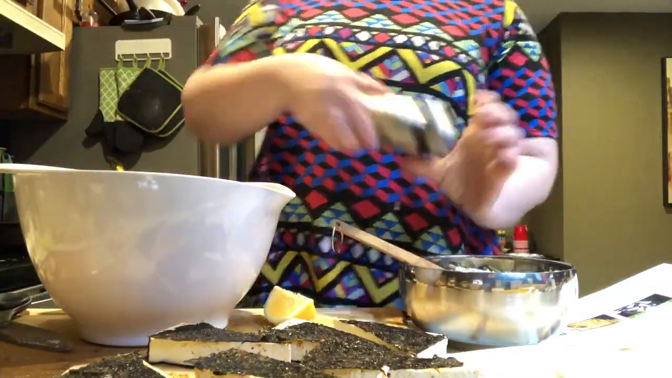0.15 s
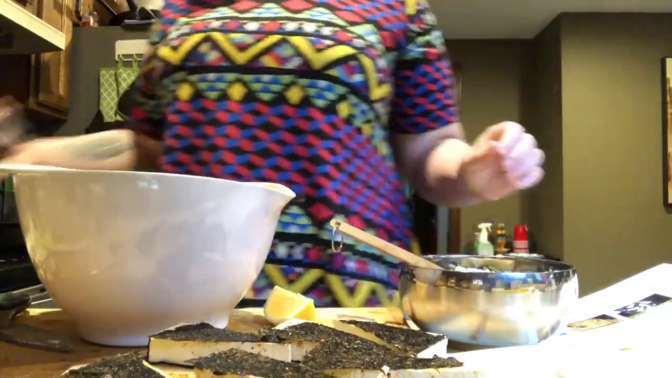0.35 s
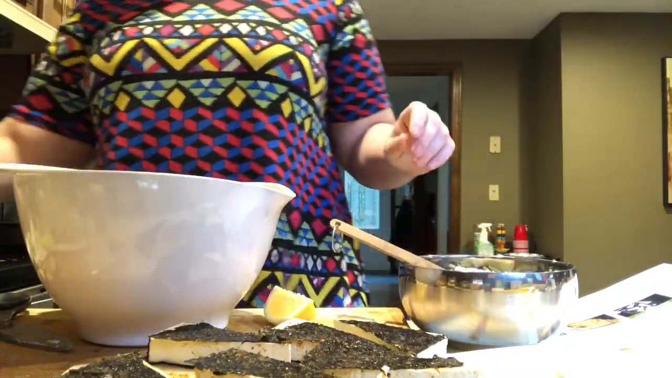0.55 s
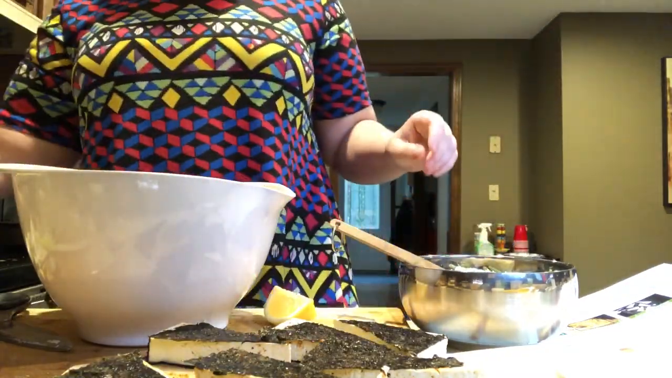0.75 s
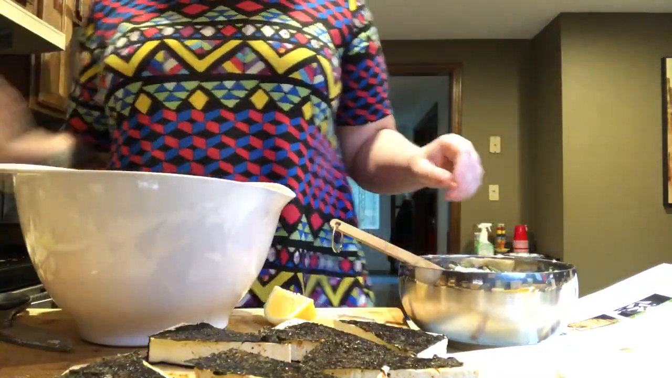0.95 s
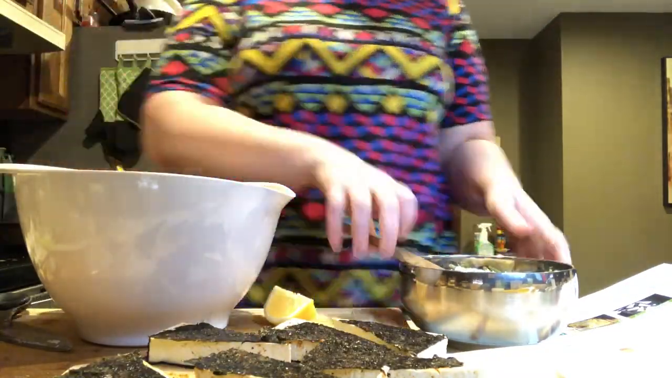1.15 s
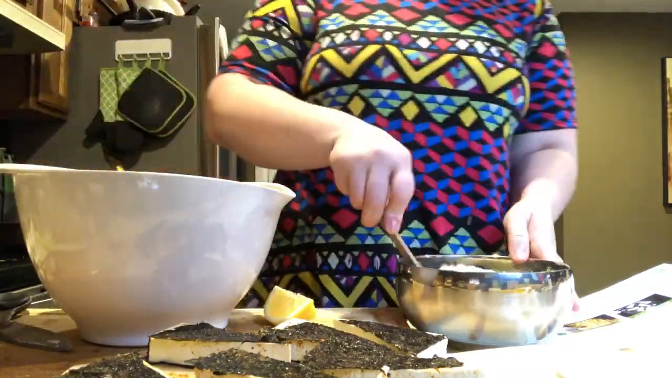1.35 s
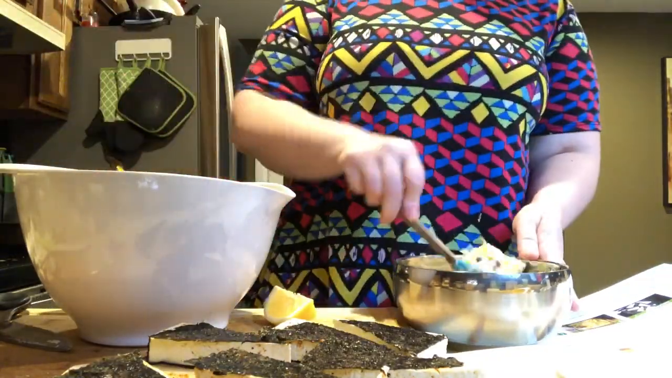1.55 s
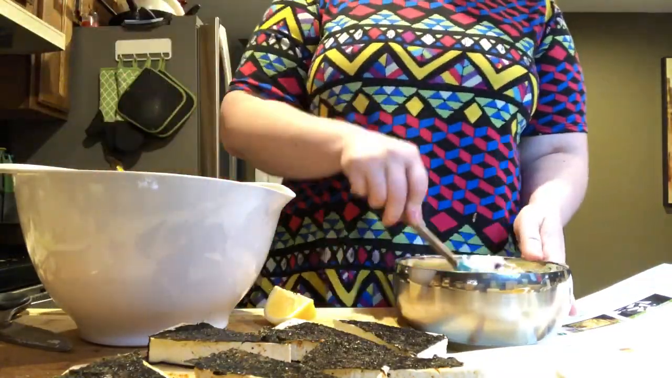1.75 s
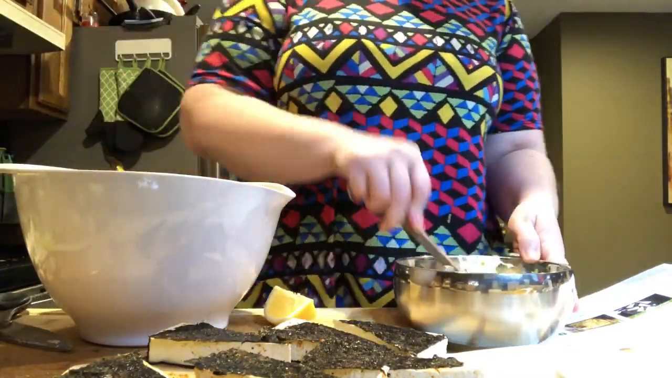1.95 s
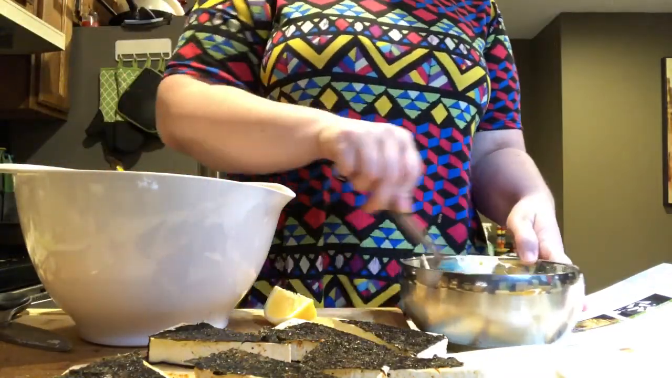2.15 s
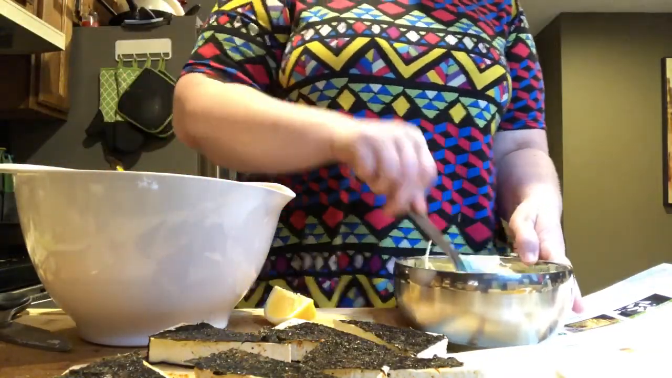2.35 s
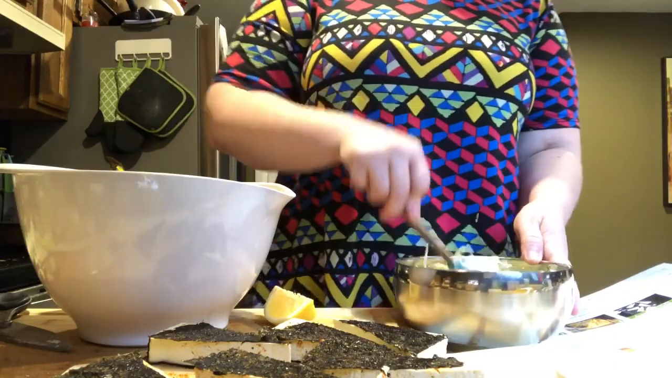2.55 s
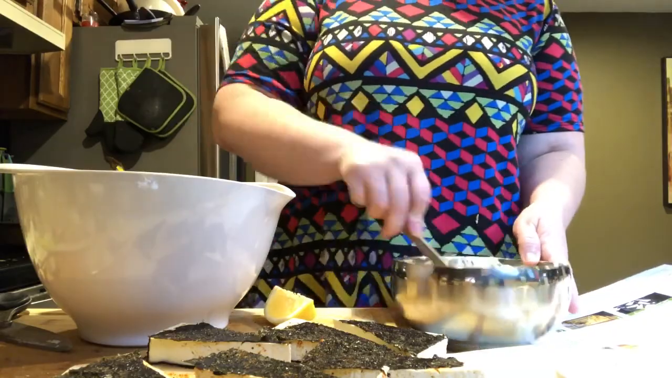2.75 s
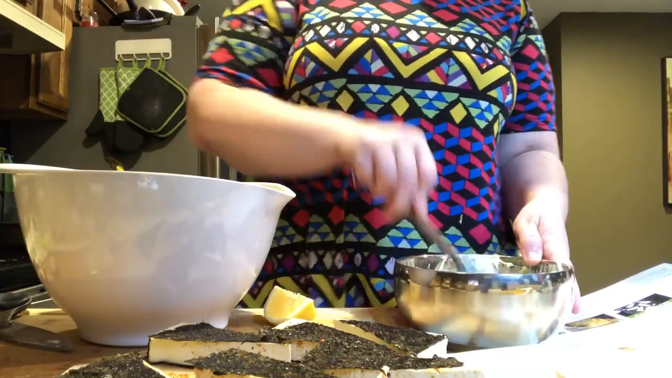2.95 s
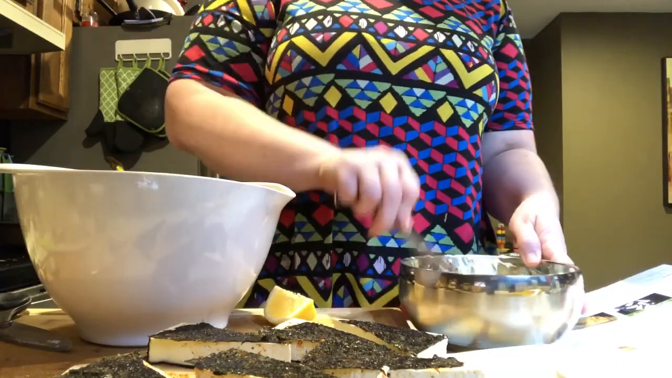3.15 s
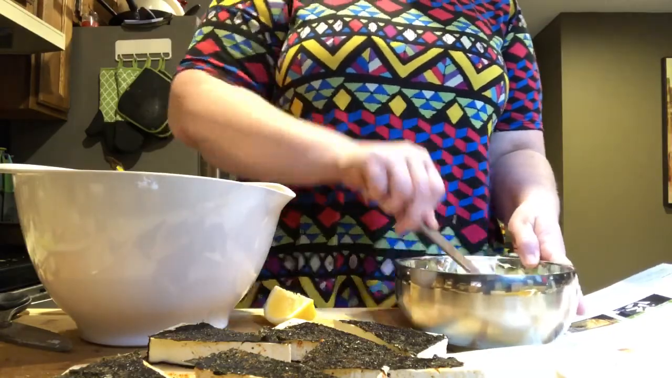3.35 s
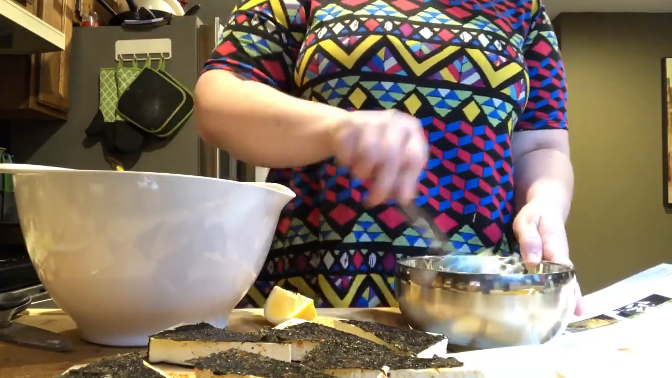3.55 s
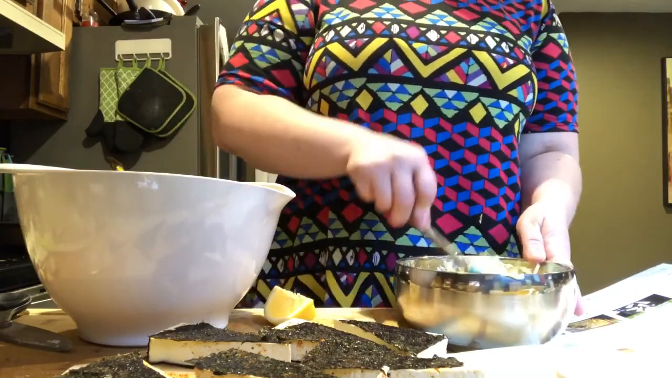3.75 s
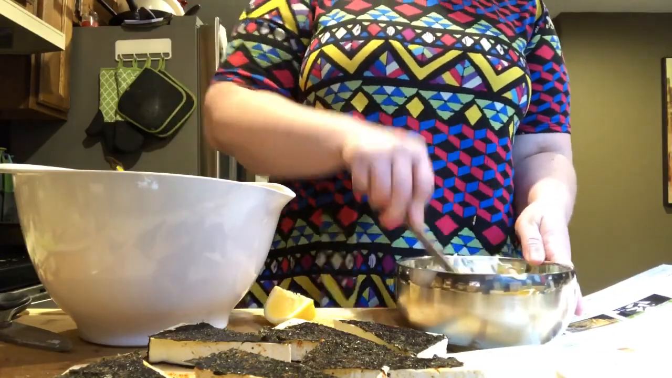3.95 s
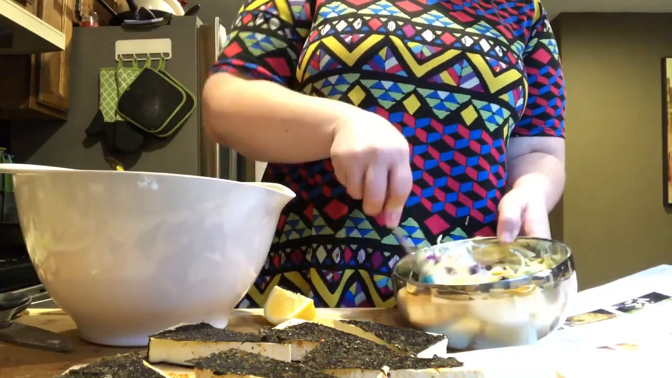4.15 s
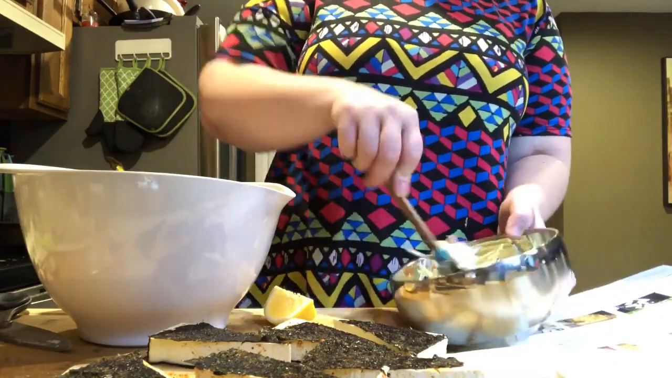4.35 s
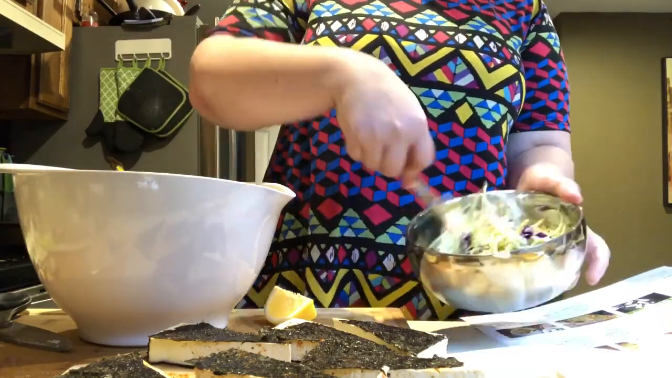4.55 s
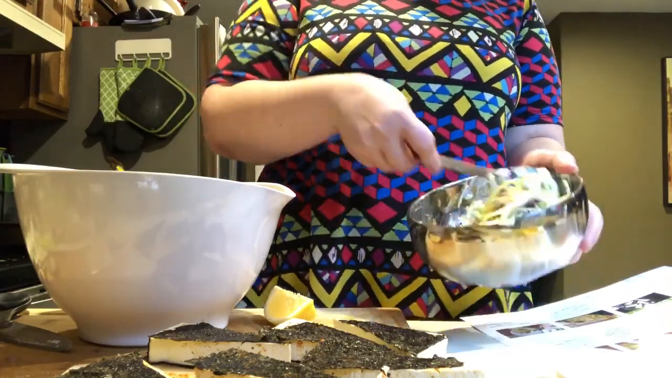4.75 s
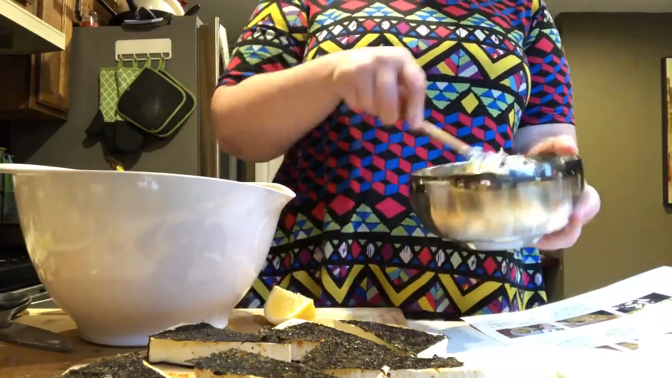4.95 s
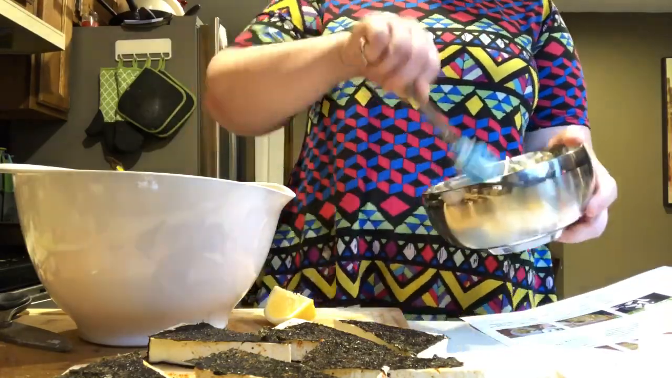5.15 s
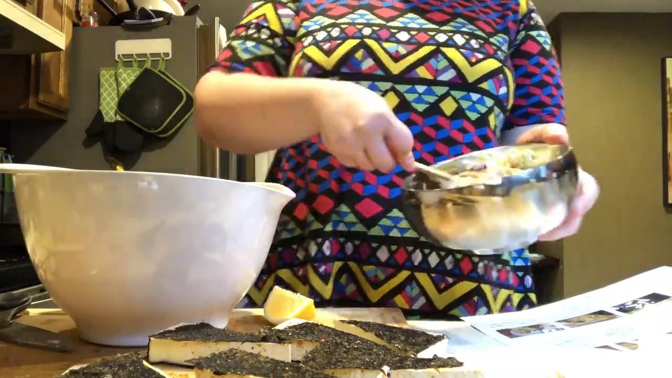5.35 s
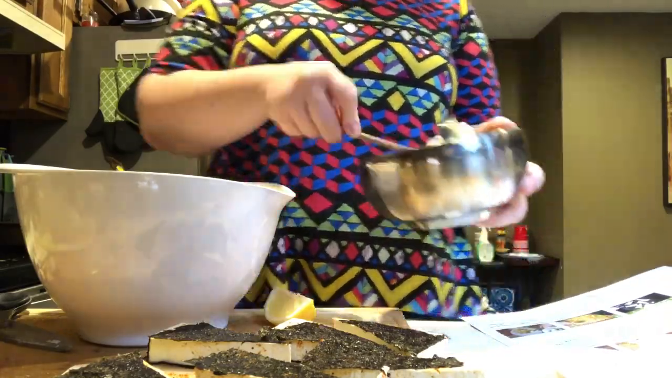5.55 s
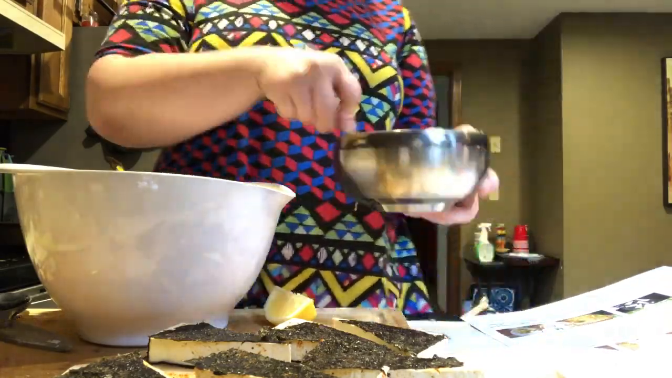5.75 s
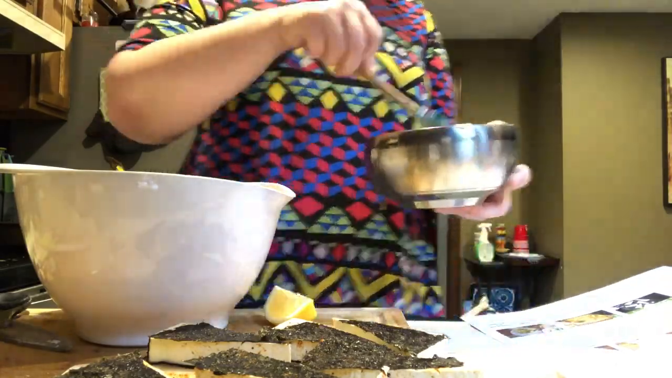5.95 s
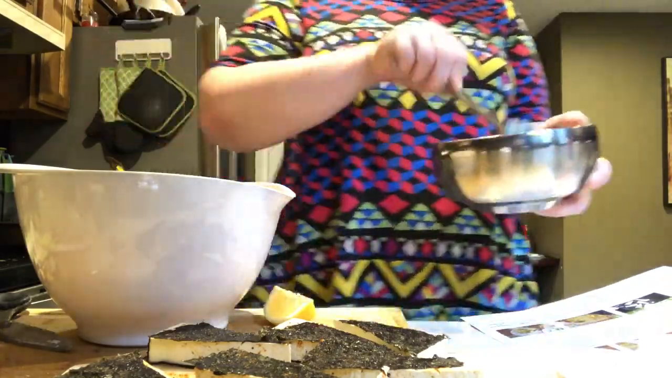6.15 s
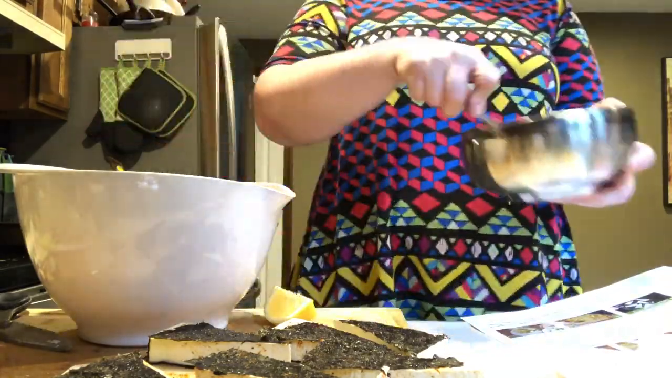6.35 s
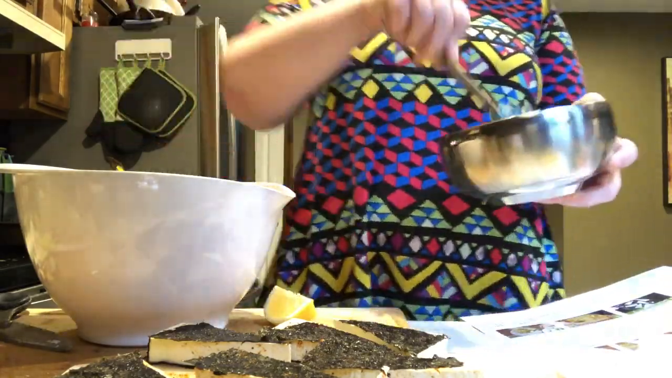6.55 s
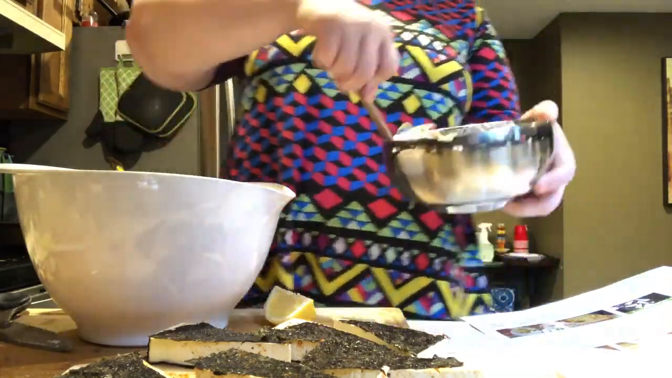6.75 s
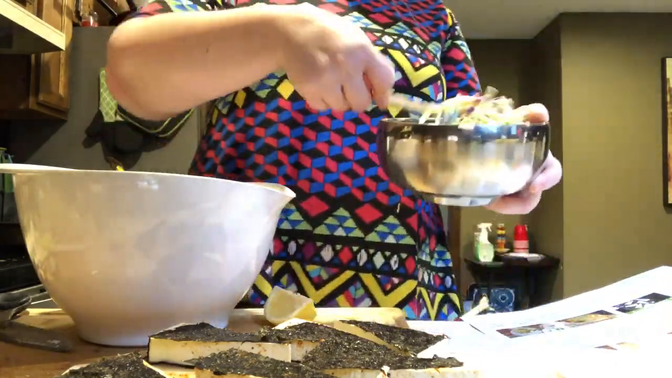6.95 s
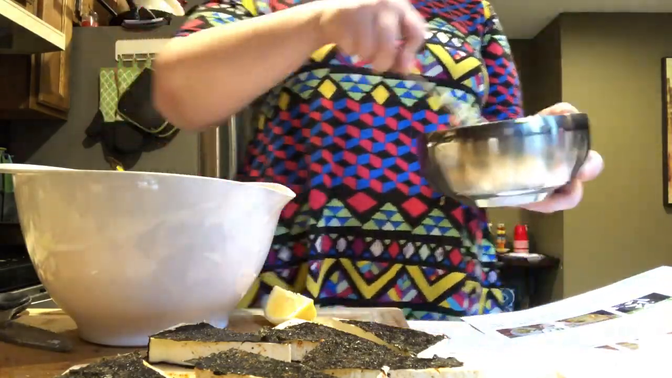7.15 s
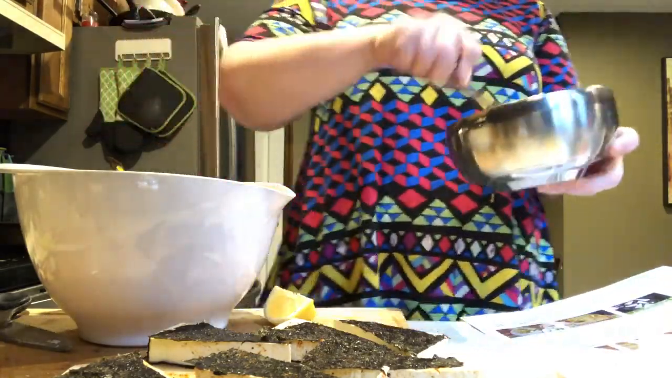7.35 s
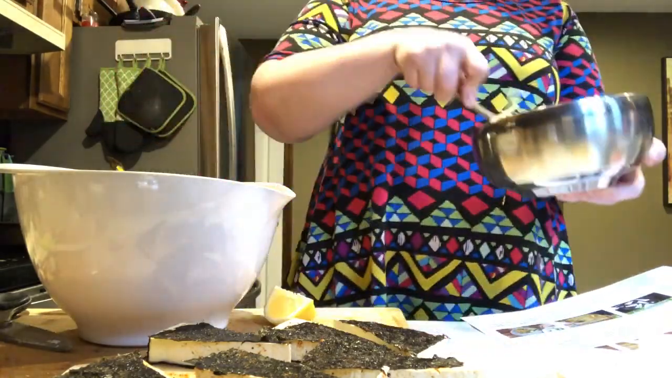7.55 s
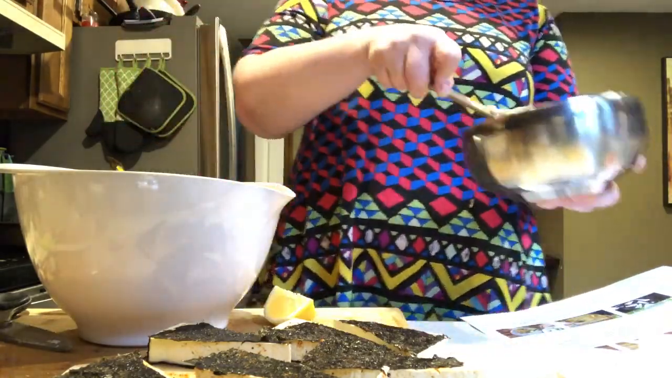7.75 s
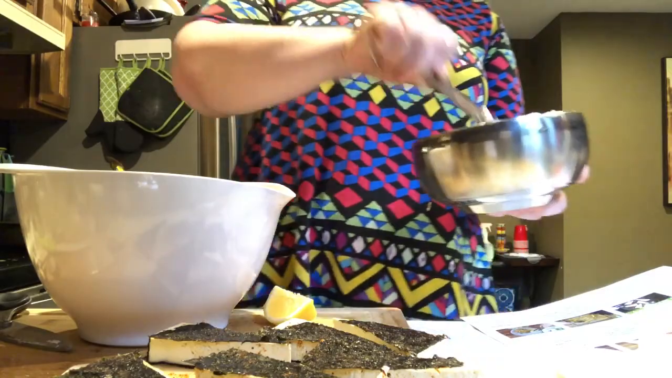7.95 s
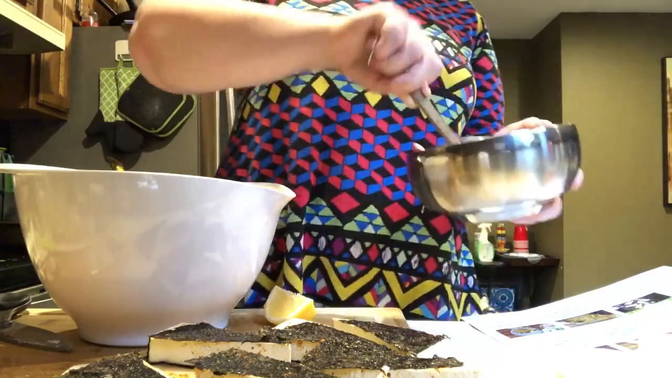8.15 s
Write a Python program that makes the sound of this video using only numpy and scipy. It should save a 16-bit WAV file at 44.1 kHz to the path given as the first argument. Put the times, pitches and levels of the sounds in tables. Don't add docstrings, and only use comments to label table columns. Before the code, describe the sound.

In a small kitchen, a grinder stops and is put down, then wet salad is folded in a clinking, scraping metal bowl.

```python
import sys
import numpy as np
from scipy import signal
from scipy.fft import rfft, irfft, next_fast_len
from scipy.io import wavfile
from scipy.ndimage import uniform_filter1d, map_coordinates

SR = 44100
rng = np.random.default_rng(int(sys.argv[2]) if len(sys.argv) > 2 else 0)


def master_out(mix):
    frames = np.transpose(np.atleast_2d(mix))
    ceiling = np.clip(frames, -1, 1)
    pcm = np.round(ceiling * 32767).astype(np.int16)
    wavfile.write(sys.argv[1], SR, pcm)


def magnitude_from_level(level_db):
    exponent = np.asarray(level_db, float) / 20
    return 10 ** exponent


N = 362502

# [f/Hz, level/dB, t60/s]
COUNTER_MODES = [(179, -5, 0.044), (250, 2, 0.052), (334.4, 0.5, 0.04), (484.4, 0, 0.041),
                 (662, -1.5, 0.046), (1047, -7.5, 0.058), (1260, -15, 0.017)]
# [f/Hz, level/dB, t60/s]
WALL_MODES = [(1164, -11.5, 0.018), (1390, -4, 0.038), (1580, -8, 0.017), (2010, -20, 0.024),
              (2373, -2, 0.025), (2777, -10, 0.02)]


def unit(x):
    return x / np.sqrt(np.mean(x ** 2) + 1e-20)


def along(points, hz):
    f, v = np.transpose(points)
    return np.interp(np.log(hz + 1), np.log(f + 1), v)


def gains(rows):
    s, *columns = np.transpose(rows)
    t = np.arange(N) / SR
    return [magnitude_from_level(np.interp(t, s, db, -140, -140)) for db in columns]


def wobble(rate):
    coarse = np.arange(0, N + 64, 64)
    knots = rng.standard_normal(int(N * rate / SR) + 4)
    return np.interp(np.arange(N), coarse, map_coordinates(knots, [coarse * rate / SR]))


def filtered(x, response):
    m = next_fast_len(N + SR // 2)
    return irfft(rfft(x, m) * response(np.fft.rfftfreq(m, 1 / SR)), m)[:N]


def body(modes):
    def response(f):
        total = 0
        for k, (center, width, db) in enumerate(modes):
            damping = 1j * f * width
            total = total + (-1) ** k * magnitude_from_level(db) * damping / (center ** 2 - f ** 2 + damping)
        return total
    return response


def steep(modes):
    return lambda f: body(modes)(f) ** 2


def grit(rate, spread_db, clump_db, bed):
    sizes = magnitude_from_level(spread_db * np.tanh(rng.standard_normal(N) / 2) * 2)
    slips = (rng.random(N) < rate / SR) * sizes * rng.choice([-1, 1], N)
    return (unit(slips) + bed * rng.standard_normal(N)) * magnitude_from_level(clump_db * np.tanh(wobble(90)))


def grains(start, stop, hz, scatter_hz, t60, count):
    when = rng.uniform(start, stop, count)
    pitch, size = rng.standard_normal((2, count, 1))
    t = np.arange(SR // 200) / SR
    fade = np.sqrt(np.hanning(2 * len(t))[len(t):])
    tones = np.sin(2 * np.pi * np.clip(hz + scatter_hz * pitch, 1000, 16000) * t)
    ticks = magnitude_from_level(3.1 * size - 60 * t / t60) * tones * fade
    places = (when * SR).astype(int)[:, None] + np.arange(len(t))
    out = np.bincount(places.ravel(), ticks.ravel(), N)[:N]
    return unit(out) * np.sqrt((stop - start) * SR / N)


def add(track, s, sound):
    part = track[round(s * SR):][:len(sound)]
    part += sound[:len(part)]


def ring(modes, t, attack, scatter=0.03):
    tones = 0
    for hz, db, t60 in modes:
        strength, detune = rng.standard_normal(2)
        decay = magnitude_from_level(db + 3.5 * strength - 60 * t / t60)
        tones = tones + decay * np.sin(2 * np.pi * hz * (1 + scatter * detune) * t)
    rough = 1 + 4 * uniform_filter1d(rng.standard_normal(len(t)), size=80)
    return tones * rough * (1 - np.exp(-t / attack))


def chirp(t, hz, t60):
    cycles = hz * (t + 3.467 * 0.00109 * (1 - np.exp(-t / 0.0007)))
    return magnitude_from_level(-60 * t / t60) * np.sin(2 * np.pi * cycles) * (1 - np.exp(-t / 0.003))


def kitchen(x):
    # [f/Hz, t60/s]
    decay_times = [(200, 0.26), (1500, 0.08), (6000, 0.14), (15000, 0.093)]
    out, step = np.zeros(N), SR // 4
    for start in range(0, N, step):
        hz, t, z = signal.stft(rng.standard_normal(SR // 3), SR, nperseg=256)
        decay = magnitude_from_level(-60 * t / along(decay_times, hz)[:, None])
        tail = signal.istft(z * decay, SR, nperseg=256)[1]
        echo = signal.fftconvolve(x[start:start + step], tail / np.linalg.norm(tail))
        add(out, start / SR + .004, echo)
    return out


def refrigerator():
    # [f/Hz, level/dB rms]
    hum = [(119.5, -67.5), (241, -72), (292, -69.5), (527.6, -69.5), (581.4, -69), (4323, -80.5),
           (4560, -78.5), (6961, -84.5), (7924, -87)]
    # [f/Hz, level/dB per Hz]
    air = [(15, -74), (25, -59), (59, -13), (92, -11), (108, 1), (206, -13.5), (236, -0.5), (317, -12),
           (489, 1.5), (818, -11), (2160, -21.5), (2350, -23), (4490, -28.5), (4870, -27), (16000, -32)]
    air_db, shade_db, shaded_s = -59.5, 1, 0.52
    t, drift = np.arange(N) / SR, wobble(7)
    shade = shade_db / (1 + np.exp((t - shaded_s) / 0.09))
    tones = np.zeros(N)
    for hz, db in hum:
        phase = 0.81 * np.roll(drift, int(hz * 40))
        tones += magnitude_from_level(db + 2 - (hz > 4000) * shade) * np.sin(2 * np.pi * hz * t + phase)
    rush = unit(filtered(rng.standard_normal(N), lambda f: magnitude_from_level(along(air, f))))
    return tones + magnitude_from_level(air_db + 0.24 * wobble(3.49)) * rush


def mill():
    # [t/s, level/dB]
    crunch_level = [
        (0.0, -38.5),
        (0.03, -40),
        (0.05, -57),
        (0.14, -67),
    ]
    # [f/Hz, width/Hz, level/dB]
    burr = [(740, 380, 1.5), (1740, 240, 2), (3400, 1200, -3.5), (7700, 2000, -4), (12000, 9000, -10.5)]
    # [t/s, shell/dB, cap/dB, hopper/dB]
    rattle_level = [
        (.315, -90, -88, -85),
        (0.345, -66, -66, -68),
        (0.4, -44.5, -46, -58),
        (0.475, -47, -42.5, -93),
        (0.5, -53, -55, -69),
        (0.6, -56.5, -49, -59),
        (0.681, -79, -71, -68),
    ]
    # [f/Hz, scatter/Hz, t60/s]
    parts = [(8600, 470, 0.015), (12100, 1000, 0.009), (5400, 660, 0.0045)]
    # [t/s, peak level/dB, t60/s, brightness/dB]
    set_down = [
        (0.666, -28, 0.068, -11.5),
        (0.689, -30.5, 0.18, -17),
        (0.714, -44, 0.59, -9.5),
        (0.779, -43, 0.15, -9.5),
        (0.874, -41.5, 0.23, -41),
        (0.966, -44, 0.48, -23),
        (1.038, -44.5, 0.2, -15.5),
    ]
    # [f/Hz, width/Hz, level/dB]
    shelf = [(292, 134, 1.5), (470, 350, -3), (920, 280, -6.5), (2100, 200, -10), (2400, 350, -9),
             (3100, 1770, -14)]
    # [t/s, peak level/dB, f/Hz]
    seeds = [(0.1451, -54, 8880), (0.186, -51, 7900), (0.2104, -55, 7920), (0.356, -38, 12100),
             (0.3646, -33, 12500), (0.375, -30, 11900), (0.39, -29, 12000), (0.4057, -27, 8100),
             (0.437, -26, 12000), (0.4424, -39, 11200), (0.4484, -25, 12100), (0.4544, -31, 9210),
             (0.4614, -25, 9290), (0.4674, -28, 11700), (0.4739, -34, 11700), (0.5039, -34, 11700),
             (0.5428, -31, 12400), (0.5535, -22.5, 12100), (0.5756, -35, 12600), (0.5974, -37, 12600),
             (0.6114, -43, 12200), (0.6474, -42, 12200), (0.7244, -52, 8780), (0.7767, -44, 14600),
             (0.7991, -48, 11700), (0.847, -52, 7450)]

    crunch = gains(crunch_level)[0] * unit(filtered(grit(1600, 3.4, 1.0, 0.37), body(burr)))
    first, last = rattle_level[0][0], rattle_level[-1][0]
    rattle = np.zeros(N)
    for gain, part in zip(gains(rattle_level), parts):
        rattle += gain * grains(first, last, *part, count=400)

    low, high, landing = np.zeros(N), np.zeros(N), np.zeros(N)
    t = np.arange(SR // 4) / SR
    for s, db, t60, bright_db in set_down:
        shake = rng.standard_normal((2, len(t))) * (1 - np.exp(-t / 0.00056))
        add(low, s, magnitude_from_level(db + 10.0 - 60 * t / t60) * shake[0])
        add(high, s, magnitude_from_level(db + bright_db + 16.5 - 60 * t / (1.6 * t60)) * shake[1])
    short = t[:400]
    for s, db, hz in seeds:
        jitter = 0.14 * np.cumsum(rng.standard_normal(400))
        tick = magnitude_from_level(db + 1.5 - 60 * short / .004) * np.sin(2 * np.pi * hz * short + jitter)
        add(landing, s, tick * (1 - np.exp(-short / .0001)))
    land_s, land_db = set_down[0][:2]
    shelf_hum = magnitude_from_level(-45) * np.sin(2 * np.pi * 300 * t) / (1 + np.exp((t - .055) / 0.003))
    add(landing, land_s + 0.0082, shelf_hum)
    add(landing, land_s, magnitude_from_level(land_db) * 3.9 * chirp(t, 664, 0.016))
    hollow = filtered(low, body(shelf[:3])) + filtered(high, body(shelf[2:]))
    return crunch + rattle + landing + hollow


def knocks():
    # [t/s, peak level/dB, thud f/Hz, wall/dB, rim/dB]
    flat = [(1.522, -40, 487, -13, -21), (2.01, -36.5, 290, -2, -20), (2.094, -26, 514, -10, -28),
            (2.293, -25.5, 528, -7, -20), (2.491, -27.5, 471, -4.5, -29), (2.706, -11.5, 553, -5.5, -17.5),
            (2.819, -20.5, 650, 1, -28), (2.953, -22.5, 537, -6.5, -21), (2.988, -17.5, 580, -3.5, -17),
            (3.08, -23, 570, 1.5, -13.5), (3.23, -24, 495, -11.5, -18.5), (3.396, -23.5, 489, -8, -26),
            (3.66, -31.5, 516, -22, -30), (4.095, -34, 586, -11, -22), (4.12, -34, 530, -5, -15),
            (4.407, -26.5, 585, -17, -24)]
    # [t/s, peak level/dB, thud f/Hz, wall/dB, rim/dB]
    edge = [(1.96, -33.5, 233, -20, -29), (2.017, -29, 530, -21, -28), (2.144, -37.5, 391, -12, -32),
            (2.187, -37, 520, -14, -30), (2.228, -40, 517, -5, -8), (2.35, -33, 660, -16, -18),
            (2.381, -30, 500, -21, -27), (2.855, -14.5, 553, -2, -8.5), (2.929, -23, 634, -4, -10),
            (3.092, -28, 560, -6, -20), (3.496, -37.5, 1040, 8, -6.5), (3.555, -29.5, 250, -12, -20.5),
            (3.596, -32, 550, -10, -22), (3.618, -36, 607, 7, -8), (4.009, -27, 620, -4, -13.5),
            (4.17, -38.5, 510, -10, -27), (4.195, -43, 510, -16, -28), (4.30, -38, 520, -18, -24),
            (4.375, -44, 540, -18, -26), (.08, -43.5, 507, -7, -25)]
    # [f/Hz, level/dB, t60/s]
    rim_modes = [(3800, -12.5, 0.027), (4700, 1.5, 0.021), (5340, -1, 0.021), (7550, -16, 0.029),
                 (8050, -9, 0.029), (9900, -11, 0.024), (10800, -18, .04)]
    flat_boom_db, edge_boom_db = -38, -52
    boom_grows = 0.24
    out, t = np.zeros(N), np.arange(SR // 6) / SR
    blows = [(*row, flat_boom_db) for row in flat] + [(*row, edge_boom_db) for row in edge]
    for s, db, hz, wall_db, rim_db, boom_db in blows:
        crack = magnitude_from_level(-60 * t / 0.0057) * uniform_filter1d(rng.standard_normal(len(t)), size=3)
        wall = magnitude_from_level(wall_db - 9.0) * ring(WALL_MODES, t, 0.00026, scatter=0.011)
        rim = magnitude_from_level(rim_db - 2.0) * (ring(rim_modes, t, 0.001, scatter=0.0043) + 2.0 * crack)
        thud = 2.74 * chirp(t, hz, .019) + magnitude_from_level(wall_db / 2 - 6.5) * chirp(t, 2.25 * hz, 0.024)
        counter = magnitude_from_level(-7.0) * ring(COUNTER_MODES[3:], t, 0.0025, scatter=0.068)
        boom_gain = magnitude_from_level(boom_db + 8 + boom_grows * (db + 29.5))
        boom = boom_gain * ring(COUNTER_MODES[:3], t, 0.0046, scatter=0.064)
        add(out, s + 0.00495, boom)
        add(out, s + 0.00081, magnitude_from_level(db) * (thud + counter + wall + rim))
    return filtered(out, lambda f: (1j * f / (90 + 1j * f)) ** 2)


def contacts():
    # [t/s, peak level/dB, f/Hz]
    taps = [(1.647, -30, 2570), (2.3807, -19.5, 1660), (2.5372, -28, 1630), (2.6452, -24.5, 1790),
            (2.659, -19, 2010), (2.818, -14.5, 2010), (3.197, -31, 1700), (3.4875, -33, 1580),
            (3.7436, -21, 1660), (3.774, -26, 1780), (3.801, -20, 1810), (3.8285, -27, 1870),
            (3.846, -23, 1800), (3.914, -26.5, 1890), (4.295, -33, 1700), (4.4694, -30, 1720),
            (5.311, -31.5, 2000), (5.5216, -46, 1500), (5.8389, -36, 1430), (6.437, -32.5, 1490),
            (6.6997, -44, 2280), (6.7976, -38, 1940), (7.1043, -37, 2100), (7.579, -33, 1630),
            (7.737, -23, 1590)]
    # [t/s, peak level/dB, f/Hz]
    catches = [(1.4112, -40, 1710), (1.4635, -34, 1530), (1.5504, -54, 1520), (1.566, -37, 1760),
               (1.6212, -32, 1660), (1.6714, -44, 1740), (1.6864, -37, 1740), (1.7114, -54, 1770),
               (1.7628, -41, 1740), (1.8024, -39, 1650), (1.864, -46, 1910), (1.927, -32, 1640),
               (1.994, -34, 1560), (2.0814, -42.5, 1600), (2.148, -33, 1500), (2.1864, -56, 2390),
               (2.3451, -51, 1880), (2.3565, -39, 1690), (2.4728, -39, 1820), (2.5875, -36, 1540),
               (2.7906, -43, 2050), (3.091, -41, 1220), (3.1044, -49, 1200), (3.4979, -27, 1530),
               (3.53, -39, 1650), (3.6192, -23.5, 1670), (3.8663, -26, 1960), (3.894, -30.5, 1880),
               (4.1684, -46, 1710), (4.2424, -48, 1780), (4.324, -28, 1590), (4.335, -38, 1590),
               (4.6105, -46, 1330), (4.941, -46, 1450), (5.0505, -45, 1450), (5.4355, -49, 2070),
                  (5.6126, -52, 2100), (5.6594, -48, 1240), (5.6634, -36.5, 2100), (5.7872, -42, 2110),
                  (5.9464, -44, 2080), (6.1419, -52, 2100), (6.157, -58, 1210), (6.4218, -44, 1440),
                  (6.4931, -47, 2090), (6.5316, -53, 1330), (6.9513, -44, 2090), (7.0545, -50, 1960),
                  (7.1174, -38, 2110), (7.1566, -45, 1410), (7.3078, -44, 1440), (7.418, -50, 1620),
                  (7.4693, -48, 1280), (7.6021, -37, 1560), (7.8695, -44, 1530), (7.8941, -34, 1930),
                  (7.9996, -48, 1300), (8.0182, -44, 1210), (8.0536, -42, 2080), (8.0631, -37, 1960),
                  (8.1494, -41, 2100), (8.2053, -38, 2090)]
    # [t/s, peak level/dB, f/Hz]
    pops = [(0.186, -45, 8400), (.778, -45, 4000), (.778, -49, 11000), (3.968, -42, 12500),
            (3.815, -47, 12000), (4.468, -42, 4500), (4.531, -50, 9040), (1.93, -30, 8730),
            (2.194, -47, 9900), (2.587, -40.5, 7430), (2.753, -33, 9900), (3.1218, -32.5, 9400),
            (3.197, -31, 14500), (3.22, -31.5, 8870), (3.691, -43, 9200), (3.917, -43, 6200),
            (3.9553, -38, 7900), (4.029, -45, 8360), (4.367, -42, 5280),
            (4.666, -54, 6000), (4.7537, -49.5, 7600), (4.884, -44, 10600), (4.9405, -37, 8600),
                 (5.378, -43, 7430), (5.6703, -27.5, 6740), (5.787, -44.5, 5400), (5.9308, -48.5, 9100),
                 (6.281, -50, 8040), (6.322, -50, 13700), (6.917, -46.5, 7380), (7.0134, -46.5, 5200),
                 (7.0712, -44.5, 6430), (7.1448, -43, 7700), (7.173, -42, 10450), (7.3257, -49, 13000),
                 (7.422, -49, 5500), (7.4695, -40.5, 6330), (7.579, -46, 12400), (7.6041, -38.5, 5220),
                 (7.8684, -46, 6600), (7.8944, -37, 6560), (8.148, -44.5, 6340)]
    # [t/s, level/dB, f/Hz, t60/s]
    chimes = [(1.583, -48.5, 6570, 0.099), (1.583, -47.5, 7800, 0.077), (2.657, -44, 6800, 0.065),
              (2.645, -32, 2300, 0.12), (2.66, -32, 2010, .15), (2.685, -40, 2030, .1),
              (2.79, -46, 2500, 0.068), (1.8, -41, 3700, 0.087), (3.5, -49, 2400, 0.042),
              (8.5, -42, 1780, 0.18), (6.0, -45, 250, 0.13), (3.325, -50, 5400, .12)]
    # [t/s, level/dB, t60/s]
    bell = [(5.315, -66, 0.22), (5.44, -61, 0.16), (5.545, -58.5, 0.27), (5.672, -48, 0.17),
            (5.79, -58, 0.35), (5.835, -56, .2), (5.95, -63, 0.34), (6.80, -62, 0.24), (6.86, -59, 0.32),
            (6.905, -58, 0.14), (6.952, -60, .3), (7.105, -56, 0.17), (7.58, -55, .2), (8.05, -58, 0.26)]
    bell_hz = 2100

    out, t = np.zeros(N), np.arange(SR // 25) / SR
    nicks = [(s, db - 0.5, hz) for s, db, hz in catches]
    for s, db, hz in taps + nicks:
        tap = magnitude_from_level(db + 5.5 - 60 * t / 0.0063) * np.sin(2 * np.pi * hz * t) * (1 - np.exp(-t / 0.0013))
        dull = uniform_filter1d(uniform_filter1d(rng.standard_normal(len(t)), size=6), size=5)
        click = magnitude_from_level(db - 8.5 - 60 * t / 0.0056) * dull
        add(out, s, tap + click + magnitude_from_level(db - 20.0) * ring(WALL_MODES, t, 0.0011))
    for s, db, hz in pops:
        spray = uniform_filter1d(rng.standard_normal(len(t)), size=5) * magnitude_from_level(-60 * t / 0.028)
        burst = 0.74 * magnitude_from_level(-60 * t / 0.0075) + spray
        add(out, s, magnitude_from_level(db) * burst * np.sin(2 * np.pi * hz * t) * (1 - np.exp(-t / 0.000086)))
    t = np.arange(SR // 6) / SR
    for s, db, hz, t60 in chimes + [(s, db, bell_hz, t60) for s, db, t60 in bell]:
        flutter = 1 + 13 * uniform_filter1d(rng.standard_normal(len(t)), size=250)
        jitter = 0.042 * np.cumsum(rng.standard_normal(len(t)))
        tone = magnitude_from_level(db - 60 * t / t60) * np.sin(2 * np.pi * hz * t + jitter)
        add(out, s, flutter * tone * (1 - np.exp(-t / 0.0034)))
    return out


def spatula():
    # [peak t/s, rise t/s, wall/dB, wet/dB]
    strokes_down = [(1.443, 0.11, -55, -63.5), (1.589, 0.026, -54, -60), (1.658, 0.026, -49, -76),
                    (1.857, 0.072, -61, -62), (1.933, 0.0037, -47.5, -42.5), (2.005, 0.031, -57.5, -59.5),
                    (2.251, 0.13, -64, -57.5), (2.394, 0.036, -46.5, -58.5), (2.506, 0.011, -55, -69),
                    (2.667, 0.054, -53, -52), (2.712, 0.0068, -45, -71), (2.819, 0.042, -50, -58.5),
                    (2.861, 0.0034, -44, -60), (2.946, 0.03, -51, -51), (3.09, 0.011, -55, -52),
                    (3.226, 0.061, -53, -50.5), (3.335, 0.032, -77, -60), (3.398, 0.03, -51, -58),
                    (3.536, 0.037, -52.5, -58), (3.628, 0.0083, -49.5, -59), (3.697, 0.033, -52.5, -64),
                    (3.846, 0.044, -49.5, -59), (3.969, 0.017, -56.5, -51), (4.128, 0.013, -56, -59),
                    (4.184, 0.017, -61, -60), (4.234, 0.015, -63, -56.5), (4.322, 0.04, -51, -62),
                    (4.369, 0.0081, -63, -62),]
    # [peak t/s, rise t/s, wall/dB, wet/dB]
    strokes_held = [(4.628, 0.014, -59, -58), (4.733, 0.061, -73, -65), (4.951, .012, -52, -54.5),
                    (5.074, 0.02, -52.5, -58.5), (5.334, 0.069, -59.5, -66), (5.444, 0.087, -61, -66.5),
                    (5.531, .016, -52.5, -64), (5.676, 0.044, -49.5, -58.5), (5.798, 0.015, -55.5, -60),
                    (5.844, 0.022, -54, -64), (6.158, 0.014, -60, -57), (6.279, 0.092, -74, -77),
                    (6.432, 0.027, -55, -59), (6.504, 0.024, -58, -76), (6.54, 0.0099, -53, -62),
                    (6.708, 0.0096, -56.5, -70), (6.763, 0.01, -61, -68), (6.878, 0.076, -60.5, -66),
                    (7.023, 0.1, -65.5, -78), (7.171, 0.072, -53, -65), (7.322, 0.036, -66, -65),
                    (7.432, 0.013, -56, -61), (7.47, 0.02, -63, -60), (7.598, 0.025, -49, -59.5),
                    (7.742, .017, -48, -60.5), (7.891, 0.053, -53.5, -61), (8.072, 0.053, -53.5, -65),
                    (8.21, 0.021, -49.5, -63.5)]
    # [t/s, level/dB]
    rasp = [
        (1.34, -88),
        (1.4, -65),
        (1.9, -68),
        (2.2, -63.5),
        (3.0, -64.5),
        (3.8, -63.5),
        (4.35, -62.5),
        (4.5, -76),
    ]
    # [t/s, level/dB]
    slide = [
        (1.36, -67),
        (2.82, -57),
        (4.33, -60),
        (4.55, -56.5),
    ]
    # [f/Hz, width/Hz, level/dB]
    scraped = [(1720, 550, 6), (2280, 970, -1), (2715, 306, 2.5), (3500, 380, -26)]
    # [f/Hz, width/Hz, level/dB]
    held_wall = [(910, 180, -9), (1500, 295, -7), (2100, 53, -3.5), (2930, 880, -17)]
    # [f/Hz, width/Hz, level/dB]
    singing = [(3850, 280, 5), (4740, 460, 6), (5400, 160, 6), (7900, 490, -2), (9950, 590, 3.5),
               (11000, 400, 1), (13900, 1500, -0.5)]
    # [f/Hz, level/dB per Hz]
    wet = [(1500, -13), (3000, -27.5), (6000, 1.5), (8000, 2), (11000, -3.5), (16000, -1.5)]
    lift_s = 4.6
    sing_down_db, sing_held_db = -61.5, -73
    sing_grows = 0.29

    push, t = np.zeros((3, N)), np.arange(-SR // 4, SR // 4) / SR
    for s, rise, wall_db, wet_db in strokes_down + strokes_held:
        fall = .018 + 0.2 * rise
        sing_db = sing_held_db if s > lift_s else sing_down_db
        rim_db = sing_db + sing_grows * (wall_db + 55.0)
        swell = magnitude_from_level(-8 * np.abs(t / np.where(t < 0, rise, fall)) ** 1.73)
        for track, db in zip(push, (wall_db, rim_db, wet_db)):
            add(track, s + t[0], magnitude_from_level(db) * swell)
    wall_push, rim_push, wet_push = push
    wall_push += gains(rasp)[0]
    held = np.arange(N) > lift_s * SR
    down_push = wall_push * ~held
    start = strokes_down[0][0] - .2

    slips = grit(900, 1.6, 9.6, 0.62)
    wall = down_push * unit(filtered(slips, steep(scraped)))
    wall += 0.25 * down_push * grains(start, lift_s, 1955, 584, .015, count=1500)
    wall += magnitude_from_level(13.0) * filtered(wall_push * held * slips, body(held_wall))
    rim = unit(filtered(grit(1200, 7.0, 4.4, 0.58), steep(singing)))
    squelch = unit(filtered(grit(2100, 3.8, 15.0, 0.82), lambda f: magnitude_from_level(along(wet, f))))
    films = grains(start, N / SR, 8060, 3970, 0.0091, count=9000)
    shreds = 0.57 * squelch + 0.55 * films
    counter = [(hz, 7 / t60, db) for hz, db, t60 in COUNTER_MODES]
    rubbing = unit(filtered(grit(300, 2.4, 7.0, 0.61), body(counter)))
    drag = (gains(slide)[0] + magnitude_from_level(-6) * down_push) * rubbing
    return drag + wall + magnitude_from_level(0.5) * rim_push * rim + wet_push * shreds


def scene():
    near = mill() + knocks() + contacts() + spatula()
    return (near + magnitude_from_level(-11.5) * kitchen(near) + refrigerator())[None]


def roll_off(x):
    return signal.sosfilt(signal.butter(12, 16770, fs=SR, output="sos"), x)


def record(dry):
    def microphone(f):
        bass_cut = ((1j * f / 70) / (1 + 1j * f / 70)) ** 2
        return bass_cut / (1 + (f / 16100) ** 120)
    mix = filtered(dry[0], microphone)[None]
    return roll_off(mix)


dry = scene()
out = record(dry)
master_out(out)
```